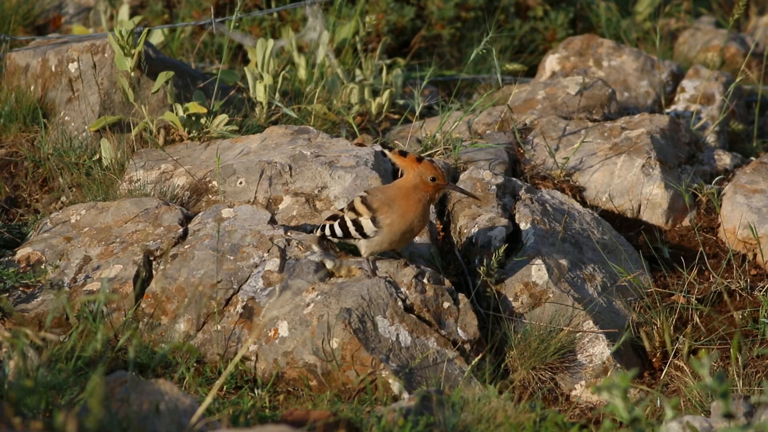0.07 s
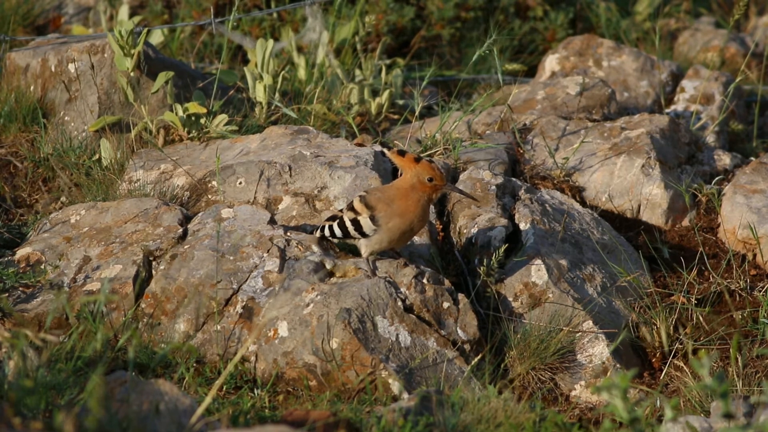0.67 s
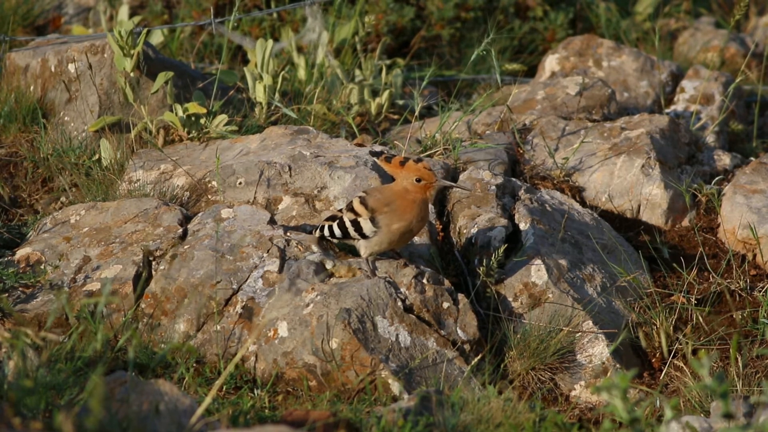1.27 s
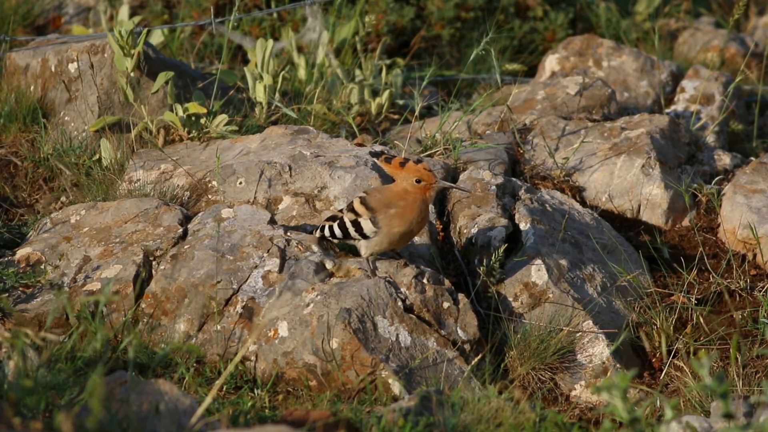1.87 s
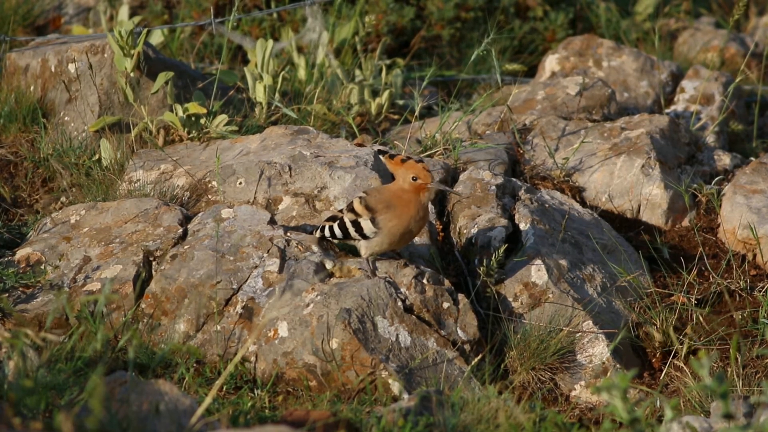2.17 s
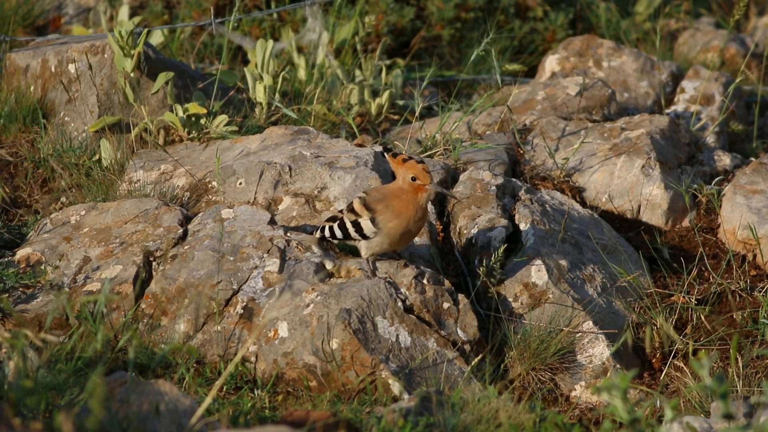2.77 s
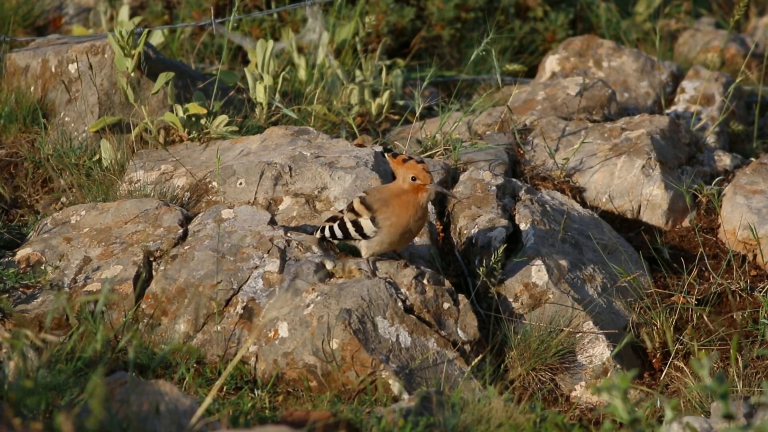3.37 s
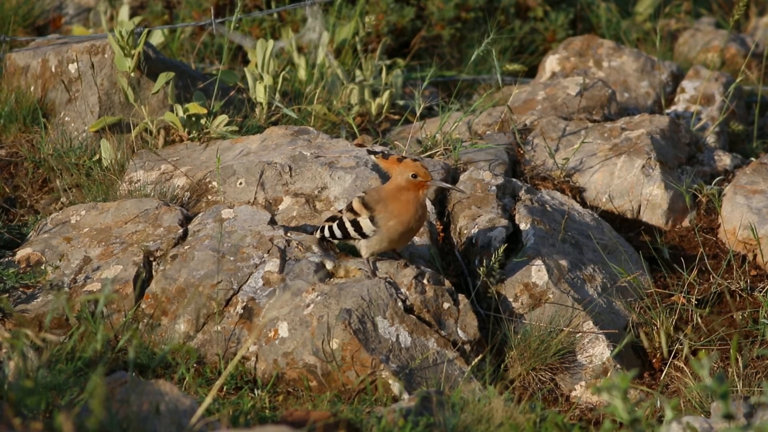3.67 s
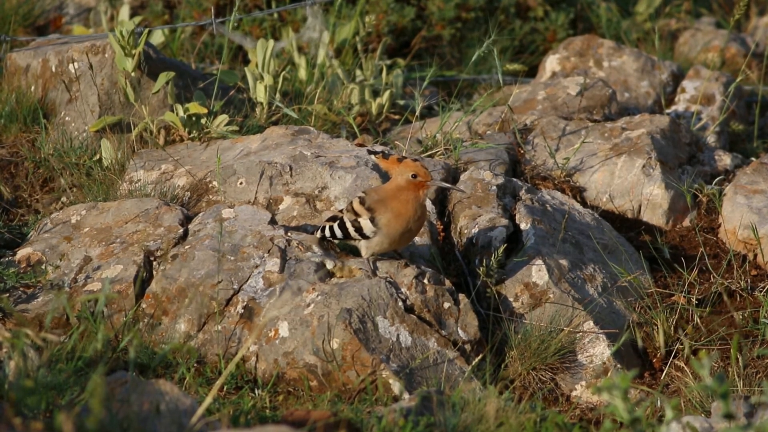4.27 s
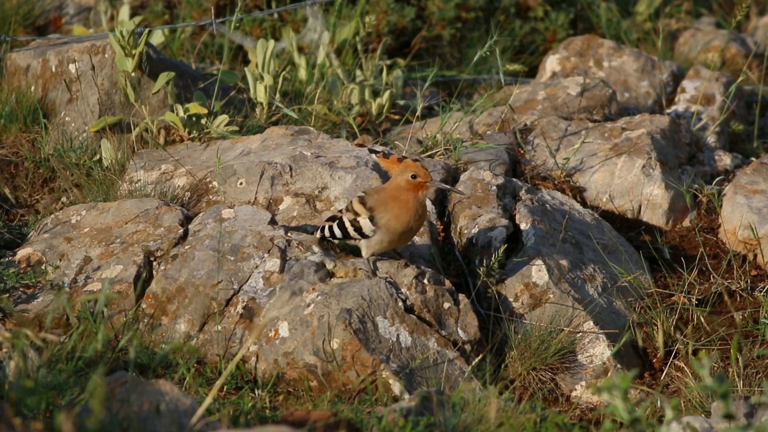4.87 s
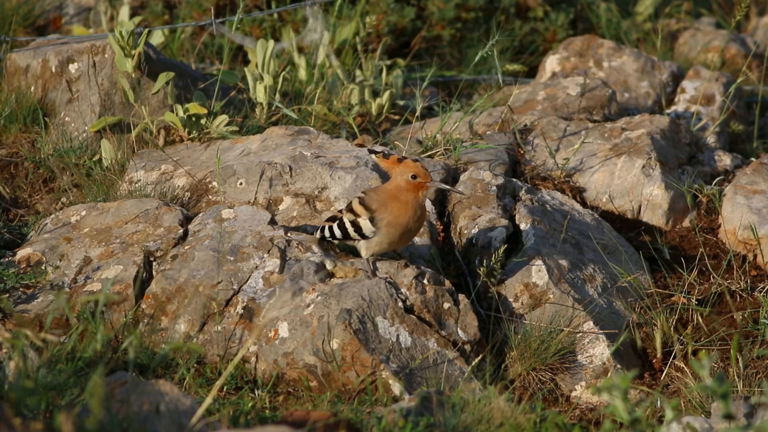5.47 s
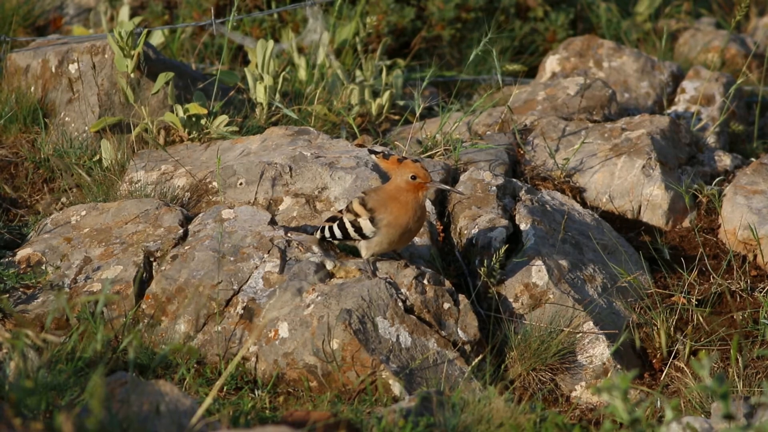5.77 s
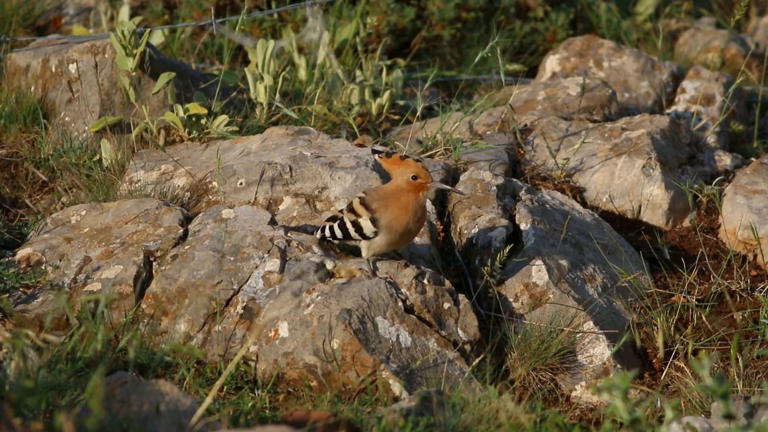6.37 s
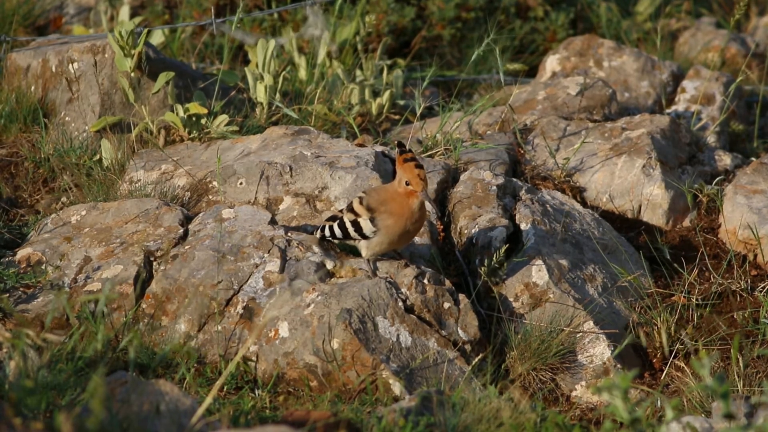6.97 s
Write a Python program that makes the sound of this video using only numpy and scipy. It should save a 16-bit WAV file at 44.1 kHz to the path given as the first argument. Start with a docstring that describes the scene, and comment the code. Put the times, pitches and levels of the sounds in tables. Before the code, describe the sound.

On a rocky hillside, a far bird holds one faint note, then two small birds trade quick runs of short falling pips. A third adds a repeated burry churr, and thin rising whistles come from further off, each call with a slight echo. One soft bump sounds near the microphone halfway through. Low rumble, high hiss and a faint insect trill continue underneath.

```python
'''"""A rocky hillside: low rumble, high outdoor hiss and a far insect's trill sound throughout, with faint
microphone hiss and a thin camera whine. A far bird holds one note; then two small birds begin to answer
each other in quick runs of falling pips. A third joins with a burry rising churr, a roll of ticks that
ends in a note, and thin rising whistles follow from further off. The rocks scatter every call back as a
short echo. Halfway through comes one soft bump, and the birds call on to the end."""
'''
import sys
import numpy as np
from scipy import signal
from scipy.fft import rfft, irfft
from scipy.io import wavfile

SR = 44100
rng = np.random.default_rng(int(sys.argv[2]) if len(sys.argv) > 2 else 0)


def inscribe(sig):
    """Save sig as 16-bit PCM at rate SR to the path in sys.argv[1].

    A 1-D sig is mono; a 2-D sig holds one channel per row.
    Samples are clipped to [-1, 1] before scaling.
    """
    pcm = np.round(np.clip(np.atleast_2d(sig).T, -1, 1) * 32767)
    wavfile.write(sys.argv[1], SR, pcm.astype(np.int16))


N = 317961

# Outdoor rumble and air. Each row: frequency in Hz, relative spectral density in dB.
RUMBLE_SPECTRUM = [(8, -62), (22, -54.5), (45, -54), (90, -54), (150, -58), (250, -63.5), (400, -70),
                   (550, -76), (800, -79), (1100, -79.3), (1600, -77), (2200, -76.5), (3000, -82.5),
                   (5000, -110)]
# The breeze. Each row: time in seconds, strength above or below the usual.
BREEZE_STRENGTH = [(0, 2.2), (.3, 1.5), (.5, -0.5), (1.3, -0.2), (1.75, 0.88), (2.1, 0.1), (3.3, -1),
                   (3.8, 0), (4.6, 0), (5.3, -0.59), (6.5, 0.7), (6.7, 2.1), (7.2, 1.5)]
# High outdoor hiss. Each row: frequency in Hz, relative spectral density in dB.
OUTDOOR_HISS_SPECTRUM = [(1000, -94), (3000, -82), (4000, -82), (4950, -81.5), (5600, -80), (6800, -76.5),
                         (7700, -76), (8200, -77.5), (8700, -84.5), (9200, -96), (10000, -98),
                         (10700, -102.8), (11600, -117)]
# Faint microphone hiss. Each row: frequency in Hz, relative spectral density in dB.
MICROPHONE_HISS_SPECTRUM = [(24, -40), (40, -12), (151, -19), (182, -16), (437, 2), (1770, -3),
                            (2190, -7.5), (3270, -1), (4890, -1), (7140, -4.5), (9480, -2), (10400, -5),
                            (11500, -15), (14900, -46), (22000, -120)]
# The camera's whine. Each row: frequency in Hz, rms level in dB.
WHINE_LINES = [(4512, -65), (4542, -64), (7359, -65), (9055, -80)]
# The insect's trill. Each row: time in seconds, rms level in dB.
TRILL_LEVEL = [(0, -57), (1.2, -58), (2.8, -54.5), (4.3, -56), (5.1, -54.5), (6, -51.5), (6.6, -55.5),
               (7.2, -56)]
# Far notes of level pitch. Each row: start in seconds, length in seconds, pitch in Hz, level in dB.
LEVEL_NOTES = [(.01, .3, 924, -50.5), (0.951, .16, 1750, -50)]
# Far rising whistles. Each row: start in seconds, length in seconds, first pitch in Hz, level in dB.
RISING_WHISTLES = [(.767, 0.092, 3245, -42.5), (1.74, 0.12, 3420, -43), (2.431, 0.12, 3400, -47),
                   (3.725, 0.122, 3296, -45), (4.875, 0.12, 3290, -47), (6.16, 0.099, 3330, -45),
                   (6.74, .14, 3280, -43.5)]
# The two pipping birds. Each entry: last pip's pitch in Hz, then four times in seconds: pip length,
# second pip's length, last interval of a run, growth of the interval per pip.
PIP_VOICES = {"high": (2256, .046, .037, .095, .0057), "low": (2126, .052, .053, .098, .0088)}
# Runs of pips. Each row: start in seconds, bird, pip count, last pip's level in dB, swell per pip in dB.
PIP_RUNS = [(.13, "high", 3, -39, 2.5), (.507, "low", 3, -33, 2.5), (.537, "high", 5, -23, 2.5),
            (1.291, "low", 1, -40, 0), (1.375, "low", 3, -32, 0), (1.535, "high", 5, -31, 0),
            (2.481, "high", 5, -27, 1.3), (3.531, "high", 5, -26.7, .8), (3.557, "low", 3, -31.5, 1),
            (4.554, "low", 3, -34, 2.5), (4.594, "high", 5, -28.5, 1.5), (5.215, "low", 3, -38.5, 2.2),
            (5.566, "high", 5, -34, 0.8), (5.925, "low", 2, -35, 0), (6.593, "high", 5, -32.5, 0.7),
            (6.912, "low", 3, -34.5, 1)]
# Stray pips of birds further off. Each row: pips per second, pitch in Hz, level in dB.
STRAY_PIPS = [(4, 2170, -45.5), (1.5, 1620, -50)]
# Series of churrs, each slower than the last. Each row: start in seconds, count, period in seconds.
CHURR_RHYTHM = [(.457, 8, 0.15), (1.70, 4, 0.17), (3.032, 15, .1845), (5.81, 7, 0.2)]
# The successive ticks of a churr's roll. Each row: pitch in Hz, level in dB relative to the loudest.
ROLL_TICKS = [(1760, -21), (1980, -13.5), (2206, 0), (2223, -5.5), (2195, -6), (2260, -10)]
# Strength of the rolls. Each row: time in seconds, relative level in dB.
ROLL_STRENGTH = [(.46, -43), (1.8, -41), (3.03, -34.5), (3.3, -41), (3.59, -29.5), (3.77, -36),
                 (4.32, -32.5), (4.69, -23), (5.06, -27.5), (5.25, -38), (5.8, -39), (6.01, -26),
                 (6.4, -35.5), (6.7, -30), (7.02, -36)]
# End notes of the churrs, tending to sink and weaken. Each row: time in seconds, level in dB, pitch in Hz.
END_NOTES = [(.46, -41.5, 2730), (.76, -35.5, 2750), (.91, -47, 2680), (1.21, -40.5, 2665),
             (1.51, -40.5, 2660), (2.2, -50, 2620), (3.03, -42, 2675), (3.59, -39.5, 2615),
             (3.77, -47, 2600), (4.69, -42, 2607), (4.88, -46, 2600), (5.06, -37.5, 2610),
             (5.25, -52, 2500), (6, -47, 2450), (7, -47, 2515)]


def gain_of(db):
    """Amplitude grows tenfold for every 20 dB."""
    return 10 ** (np.asarray(db) / 20)


def unit_rms(x):
    """Normalisation to an rms of 1."""
    return x / np.sqrt(np.mean(x ** 2) + 1e-20)


def add(mix, start, sound):
    """Superposition: a sound joins the mix at a start time in seconds."""
    part = mix[max(round(start * SR), 0):][:len(sound)]
    part += sound[:len(part)]


def wander(t, max_hz):
    """Random modulation of rms about 1: a sum of twelve sines below max_hz."""
    rates, phases = rng.random((2, 12, 1))
    return np.sin(2 * np.pi * (max_hz * rates * t + phases)).sum(0) / np.sqrt(len(rates) / 2)


def tone(hz):
    """A sine whose phase is the integral of its frequency curve."""
    return np.sin(2 * np.pi * (np.cumsum(hz) / SR + rng.random()))


def fade(t, length, rise, fall):
    """An envelope with quarter-sine attack and release; times in seconds."""
    attack = np.sin(np.pi / 2 * np.clip(t / rise, 0, 1))
    release = np.sin(np.pi / 2 * np.clip((length - t) / fall, 0, 1))
    return attack * release


def coloured_noise(spectrum, db, swell_db):
    """Spectral shaping colours white noise; slow modulation makes it swell slightly."""
    hz, density_db = np.transpose(spectrum)
    bins_hz = np.fft.rfftfreq(N, 1 / SR)
    colour = gain_of(np.interp(np.log(bins_hz + 1), np.log(hz + 1), density_db))
    noise = unit_rms(irfft(rfft(rng.standard_normal(N)) * colour, N))
    return gain_of(db + swell_db * wander(np.arange(N) / SR, 3)) * noise


def rumble(deep_hz=55, deep_swing_db=2.5, body_swing_db=0.08):
    """Amplitude modulation: the far rumble follows the breeze, its deepest band the most."""
    breeze = np.interp(np.arange(N) / SR, *np.transpose(BREEZE_STRENGTH))
    air = coloured_noise(RUMBLE_SPECTRUM, db=-32.5, swell_db=0.26)
    deep = signal.sosfiltfilt(signal.butter(2, deep_hz, fs=SR, output="sos"), air, padtype="even")
    return deep * gain_of(deep_swing_db * breeze) + (air - deep) * gain_of(body_swing_db * breeze)


def camera_whine(waver_hz=2.5):
    """A line spectrum: the camera's electronics give a few thin, wavering tones."""
    t = np.arange(N) / SR
    return sum(gain_of(db) * np.sqrt(2) * tone(hz + waver_hz * wander(t, 6)) for hz, db in WHINE_LINES)


def microphone_hiss():
    """Faint broadband noise, heard as wide because its polarity is opposite in the two channels."""
    side = coloured_noise(MICROPHONE_HISS_SPECTRUM, db=-59.5, swell_db=.05)
    return np.array([side, -side])


def outdoor_hiss():
    """Ambient noise: a high outdoor hiss common to both channels."""
    return coloured_noise(OUTDOOR_HISS_SPECTRUM, db=-40.5, swell_db=0.25)


def insect(hz=5350, strokes_per_s=45.9, sharpness=5.4, waver_hz=70):
    """Stridulation: every wing stroke rings one short, unsteady tone."""
    t = np.arange(N) / SR
    stroke_cycles = strokes_per_s * t + 0.11 * wander(t, 1.99)
    strokes = abs(np.sin(np.pi * stroke_cycles)) ** (2 * sharpness)
    trill = unit_rms(strokes * tone(hz + waver_hz * wander(t, 120)))
    return gain_of(np.interp(t, *np.transpose(TRILL_LEVEL))) * trill


def whistles(mean_rise_hz_per_s=1950, flutter_db=3, waver=0.0073):
    """Propagation through air makes far whistles flutter; each holds its pitch or rises and levels off."""
    out = np.zeros(N)
    for notes, hz_per_s in (RISING_WHISTLES, mean_rise_hz_per_s), (LEVEL_NOTES, 0):
        for start, length, first_hz, db in notes:
            t = np.arange(0, length, 1 / SR)
            glide = first_hz + hz_per_s * length * np.sin(np.pi / 2 * t / length)
            pitch = glide * (1 + waver * wander(t, 115))
            amplitude = gain_of(db + flutter_db * wander(t, 91))
            add(out, start, amplitude * fade(t, length, length / 3, length / 4) * tone(pitch))
    return out


def pip_notes(climb_hz=5, stray_s=.05, scatter_hz=45):
    """Yields (start s, length s, dB, Hz): runs climb and slow, and most swell; strays fall at random."""
    for start, bird, count, last_db, swell_db in PIP_RUNS:
        last_hz, usual_length, second_length, last_interval, growth = PIP_VOICES[bird]
        for k in range(count):
            to_come = count - 1 - k
            length = second_length if k == 1 else usual_length
            yield start, length, last_db - swell_db * to_come, last_hz - climb_hz * to_come
            start += last_interval - growth * (to_come - 1)
    for per_s, hz, db in STRAY_PIPS:
        for k, (late, sharp) in enumerate(rng.random((int(per_s * N / SR), 2))):
            yield (k + late) / per_s, stray_s, db, hz + scatter_hz * (2 * sharp - 1)


def pips(lead_s=0.00101, fall_hz_per_s=3200, flutter_db=0.7, waver=0.0042):
    """Linear frequency sweep: each pip is a nearly pure tone that slides down and stops short."""
    out = np.zeros(N)
    for start, length, db, hz in pip_notes():
        t = np.arange(0, length, 1 / SR)
        pitch = (hz - fall_hz_per_s * (t - length / 2)) * (1 + waver * wander(t, 137))
        amplitude = gain_of(db + flutter_db * wander(t, 143))
        add(out, start - lead_s, amplitude * fade(t, length, rise=0.015, fall=0.012) * tone(pitch))
    return out


def churr_ticks(roll_db, period_s=0.0083, tick_s=0.012, sweep_hz=330, scatter_hz=55, uneven_db=2):
    """A rapid pulse train is heard as a burr. Yields (delay s, sound) for each upswept tick."""
    t = np.arange(0, tick_s, 1 / SR)
    for k, (hz, db) in enumerate(ROLL_TICKS):
        late, sharp, strong = rng.standard_normal(3) * min(abs(db) / 5, 1)  # weak ticks are less steady
        pitch = hz + scatter_hz * sharp + sweep_hz * (t / tick_s - .5)
        amplitude = gain_of(roll_db + db + uneven_db * strong)
        yield (k + 0.1046 * late) * period_s, amplitude * np.hanning(len(t)) * tone(pitch)


def churr_note(db, top_hz, length=0.046, scoop_hz=260, scoop_s=0.0088, flutter_db=3):
    """Exponential glide: a short fluttering note scoops up to its pitch."""
    t = np.arange(0, length, 1 / SR)
    pitch = top_hz - scoop_hz * np.exp(-t / scoop_s) + 16 * wander(t, 127)
    amplitude = gain_of(db + flutter_db * wander(t, 109))
    return amplitude * fade(t, length, rise=0.0035, fall=0.017) * tone(pitch)


def churrs(roll_lead_s=0.019, roll_boost_db=2, note_delay_s=0.018):
    """Periodic song: on every beat a roll of ticks jumps up to a higher end note."""
    out = np.zeros(N)
    times, end_db, end_hz = np.transpose(END_NOTES)
    for start, count, period in CHURR_RHYTHM:
        for beat in start + period * np.arange(count):
            roll_db = np.interp(beat, *np.transpose(ROLL_STRENGTH)) + roll_boost_db
            for delay, tick in churr_ticks(roll_db):
                add(out, beat - roll_lead_s + delay, tick)
            note = churr_note(np.interp(beat, times, end_db), np.interp(beat, times, end_hz))
            add(out, beat + note_delay_s, note)
    return out


def hillside(calls, t60=0.37, taps_per_s=2000, slope_delay_s=0.056, slope_width_s=0.027, slope_db=3):
    """Scattering from rocks gives a thin decaying tail, with a stronger patch from the slope."""
    t = np.arange(SR) / SR
    taps = rng.choice([-1., 1.], SR) * (rng.random(SR) < taps_per_s / SR) * (t > .004)
    slope = np.exp(-((t - slope_delay_s) / slope_width_s) ** 2)
    taps *= gain_of(-60 * t / t60 + slope_db * slope)
    return signal.fftconvolve(calls, taps / np.linalg.norm(taps))[:N]


def bump(start=3.5905, length=0.015, first_hz=420, last_hz=110, push_db=-21.5):
    """Impact excites damped modes: a soft, close knock that sinks in pitch, then a faint ring."""
    out, t = np.zeros(N), np.arange(0, .1, 1 / SR)
    pitch = np.interp(t, [0, length], [first_hz, last_hz])
    push = gain_of(push_db) * fade(t, length, length / 2, length / 2) * tone(pitch)
    # Each row: frequency in Hz, level in dB, seconds to decay by 60 dB.
    modes = [(240, -31, .14), (728, -35, 0.095), (890, -38, 0.063), (1250, -39, 0.033)]
    ring = sum(gain_of(db - 60 * t / t60) * np.sin(2 * np.pi * hz * t) for hz, db, t60 in modes)
    add(out, start, push)
    add(out, start + 0.0051, ring * np.clip(t / 0.0034, 0, 1))
    return out


def scene(pip_wet_db=-15, churr_wet_db=-10, whistle_wet_db=-5):
    """The ratio of reflected to direct sound grows with distance: further birds carry more echo."""
    near, burry, far = pips(), churrs(), whistles()
    scattered = gain_of(pip_wet_db) * near + gain_of(churr_wet_db) * burry + gain_of(whistle_wet_db) * far
    birds = near + burry + far + hillside(scattered)
    return birds + insect() + bump() + rumble() + camera_whine() + microphone_hiss() + outdoor_hiss()


def record(dry, cutoff_hz=11720):
    """Band limiting: a steep low-pass filter removes the highest treble."""
    lowpass = signal.firwin(1023, cutoff_hz, window=("kaiser", 9), fs=SR)
    return signal.oaconvolve(dry, lowpass[None], "same")


dry = scene()
out = record(dry)
inscribe(out)
```